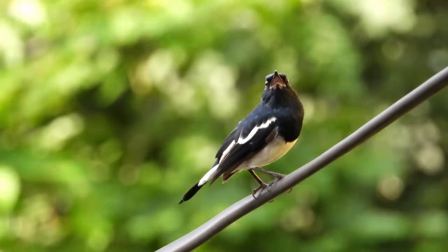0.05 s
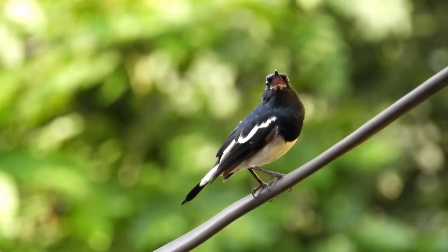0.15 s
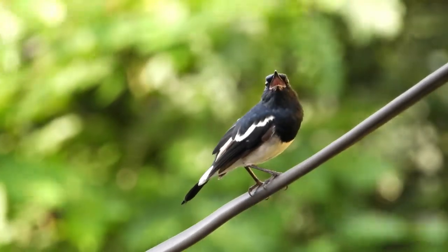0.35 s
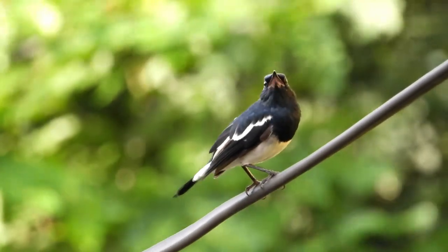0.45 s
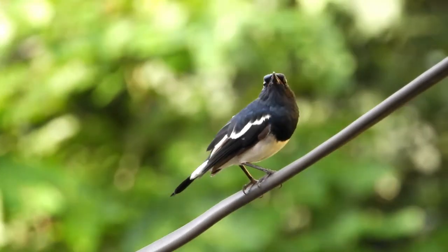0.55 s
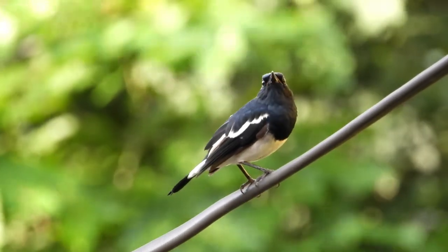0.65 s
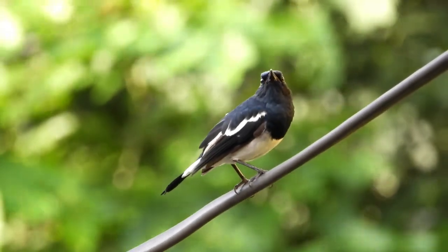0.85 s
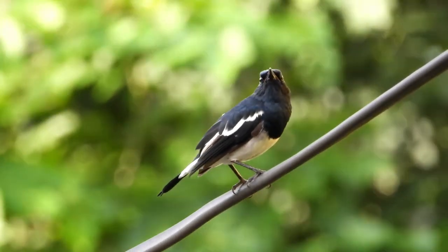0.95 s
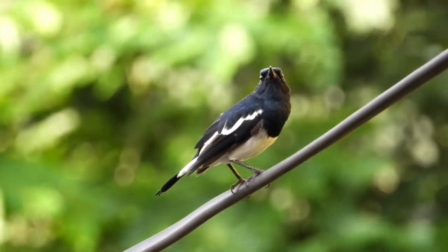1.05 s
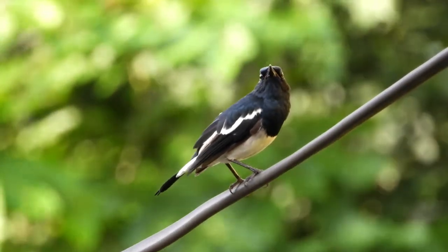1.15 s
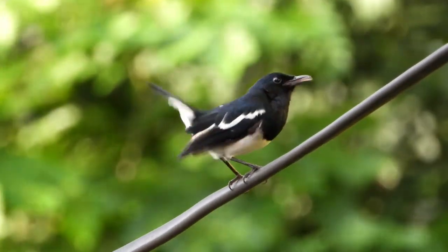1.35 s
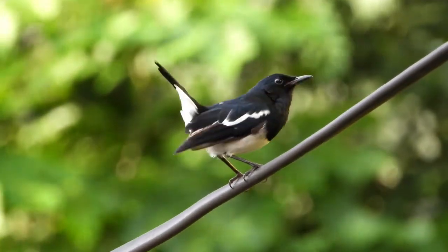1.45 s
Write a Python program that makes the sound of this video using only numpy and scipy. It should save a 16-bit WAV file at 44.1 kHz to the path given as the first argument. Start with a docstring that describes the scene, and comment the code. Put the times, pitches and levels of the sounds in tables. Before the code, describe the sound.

A small bird whistles one loud, high, clear note from about 0.2 to 0.6 seconds, arching, sagging, then flicking upward, its fluttering echo fading by about 1.2 seconds. Faint, close ticks come just before it and near its end. Soft, distant hollow knocks repeat four times a second over a gentle outdoor hiss. From about 1 to 1.5 seconds, a faint tone wavers far away.

```python
"""A soft outdoor wash of noise with tiny low blips is there from the start. A bright tick sounds nearby.
Far off, something hollow is knocked four times a second. With the first knock, a small bird on a wire
whistles one loud, high, nearly pure note that arches, sags and flicks up at its end. Trees and walls
scatter it into a dense, beating echo, and the loudest beats overload the recorder. A second tick comes
late in the note. As the echo fades, a faint, wavering tone is heard far away."""
import sys
import numpy as np
from scipy import signal
from scipy.io import wavfile

SR = 44100
rng = np.random.default_rng(int(sys.argv[2]) if len(sys.argv) > 2 else 0)


def dump(signal):
    """Clip the signal to [-1, 1] and save it as 16-bit WAV at the path in sys.argv[1]."""
    limited = np.clip(np.atleast_2d(signal).T, -1, 1)
    pcm = np.round(limited * 32767).astype(np.int16)
    wavfile.write(sys.argv[1], SR, pcm)


N = 66150   # 1.5 seconds


def from_db(db):
    """Turn decibels into a number to multiply by."""
    return 10 ** (np.asarray(db) / 20)


def rms_one(x):
    """Scale a signal so its average size (rms) is 1."""
    return x / np.sqrt(np.mean(x ** 2) + 1e-20)


def in_time(rows):
    """Join a table's points in time with straight lines: one curve for each later column."""
    times_s, *columns = np.transpose(rows)
    return [np.interp(np.arange(N) / SR, times_s, column) for column in columns]


def at_hz(points, hz):
    """Read a table at any pitch, with octaves evenly spaced."""
    pitches_hz, values = np.transpose(points)
    return np.interp(np.log(hz), np.log(pitches_hz), values)


def drift(rate_hz):
    """A smooth random wander of about plus or minus 1; a higher rate wanders faster."""
    step, settle = 40, 2000   # samples per step, opening steps thrown away
    r = np.exp(-2 * np.pi * step * rate_hz / SR)
    noise = rng.standard_normal(N // step + settle + 2)
    slow = signal.lfilter([1], [1, -2 * r, r * r], noise)[settle:]
    return np.interp(np.arange(N) / step, np.arange(len(slow)), rms_one(slow))


def stereo(pair, alike):
    """Mix two unrelated signals into left and right: alike 0 is wide, 1 is the same in both ears."""
    return np.sqrt((1 + alike) / 2) * pair[0] + np.sqrt((1 - alike) / 2) * pair[1] * [[1], [-1]]


def ring(force, hz, fade_s, soften=False):
    """Ring at one pitch when pushed. Here and below, fade_s is the time to fall by 60 dB."""
    r, w = from_db(-60 / (fade_s * SR)), 2 * np.pi * hz / SR
    gain = 1 - r if soften else 1   # keeps a ringing input from piling up
    return signal.lfilter([0, gain * np.sin(w)], [1, -2 * r * np.cos(w), r * r], force)


def struck(blows, modes, level_db, rattle_s, band_hz):
    """Each blow is a brief rattle of contacts that sets the object's own pitches (modes) ringing."""
    t = np.arange(int(.03 * SR)) / SR
    out = 0
    for hz, mode_db, fade_s in modes:
        octaves_up = np.log2(hz / np.sqrt(np.prod(band_hz)))   # from the middle of the band
        force = np.full(N, 1e-18)
        for start_s, strength_db, brightness in blows:
            rattle = rng.standard_normal(len(t)) * np.exp(-t / rattle_s) / np.sqrt(rattle_s * SR)
            gain = from_db(strength_db + level_db + mode_db + brightness * octaves_up)
            start = int(start_s * SR)
            force[start:start + len(t)] += gain * rattle
        out = out + ring(force, hz, fade_s)
    return signal.sosfilt(signal.butter(4, band_hz, "band", fs=SR, output="sos"), out)


def scatter(x, echo_db, fade_s, alike=0.26, left_db=0):
    """The direct sound plus countless small echoes from all round, made with a fading burst of noise."""
    t = np.arange(N) / SR
    rise_s, early_fade_s, farthest_s = 0.0035, 0.1, .31
    early = from_db(5.5 - 60 * t / early_fade_s)   # near leaves and walls echo strongly
    late = from_db(-60 * t / fade_s - 6 * (t > farthest_s))   # weaker past the farthest reflectors
    shape = (1 - np.exp(-t / rise_s)) * (late + early)
    tail = stereo(rng.standard_normal((2, N)), alike) * shape / np.sqrt(np.sum(shape ** 2))
    direct = x * from_db([[left_db / 2], [-left_db / 2]])
    return direct + from_db(echo_db) * signal.fftconvolve(np.atleast_2d(x), tail, axes=1)[:, :N]


def wash():
    """Soft outdoor noise, built from bands a third of an octave wide that each flicker a little."""
    # how strong the low and high parts are: pitch_hz, relative_db
    tone_colour = [(25, -31), (50, -34), (80, -16), (125, -15), (190, 0), (260, -11), (400, -7.5),
                   (600, -7.5), (800, -4), (1050, -4), (1300, -4.5), (1700, -7.5), (2500, -9), (3100, -11),
                   (4600, -6), (6400, -12), (8200, -17), (10500, -22.5), (12500, -20)]
    # how alike the two ears are: pitch_hz, likeness (0 to 1)
    likeness = [(30, .25), (70, .3), (140, 0.96), (300, 0.75), (600, 0.79), (1200, 0.8), (2500, 0.58),
                (5000, 0.22), (9000, 0.038)]
    # loudness of the whole wash: time_s, level_db
    loudness = [(0.0, -32.5), (0.354, -34), (0.7, -36), (1.5, -36)]
    out, edges_hz = 0, 22 * 2 ** np.arange(0, 9.5, 1 / 3)
    white = rng.standard_normal((2, 2, N))
    for k, (low, high) in enumerate(zip(edges_hz, edges_hz[1:])):
        hz = np.sqrt(low * high)
        pair = signal.sosfilt(signal.butter(2, [low, high], "band", fs=SR, output="sos"), white[k % 2])
        flicker_db = 2.36 * drift(rate_hz=7.1)
        out = out + from_db(at_hz(tone_colour, hz) + flicker_db) * stereo(pair, at_hz(likeness, hz))
    out = signal.sosfilt(signal.cheby2(10, 40, 12100, fs=SR, output="sos"), out)   # cut the top hiss
    return from_db(in_time(loudness)[0]) * rms_one(out)


def blips():
    """Tiny random pushes each ring one of 24 low pitches, making soft, short blips in the wash."""
    per_s, level_db, fade_s = 120, -43, .06
    pushes = (rng.random(N) < per_s / SR) * from_db(3.7 * rng.standard_normal(N))
    chosen_pitch, out = rng.integers(0, 24, N), 0
    for k, hz in enumerate(np.geomspace(230, 1250, num=24)):
        ping = ring(pushes * (chosen_pitch == k) + 1e-18, hz, fade_s)
        out = out + ring(ping, hz, fade_s, soften=True)   # ringing twice makes each blip swell in
    return from_db(level_db) * rms_one(out)


def ticks():
    """Two sharp taps nearby ring high and die fast; the first is a quick double contact."""
    # the contacts: start_s, strength_db, brightness_db_per_octave
    taps = [(.0625, -24, 2.5), (.0672, -37, -3), (.553, -30.5, 5)]
    # how a tick rings: pitch_hz, relative_db, fade_s
    modes = [(3200, -5.5, 0.01), (4900, 3, 0.0034), (5760, -6, 0.0075), (6790, -2, 0.021),
             (7590, -1, 0.0071), (8700, -12, 0.0039), (9600, -10, 0.0063), (12000, -7, 0.0024),
             (13000, -27, .005)]
    clicks = struck(taps, modes, level_db=10, rattle_s=.0035, band_hz=(2800, 14000))
    return scatter(clicks, echo_db=-0.5, fade_s=0.059)


def knocks():
    """Something hollow rings far off at each blow, and a brighter second contact follows at once."""
    # the blows: start_s, strength_db, brightness_db_per_octave
    blows = [(0.1857, -21, -1), (0.4478, -25.5, -0.5), (0.7028, -25, .5), (.955, -29, -1),
             (1.1927, -26, -2.5)]
    # how the hollow thing rings: pitch_hz, relative_db, fade_s
    body_modes = [(341.5, -19, 0.16), (604, -11, 0.097), (1028, -4, 0.038), (1420, -2, 0.021),
                  (1610, -9, 0.032), (1886, -4.5, 0.067), (2306, -4.5, 0.019), (2630, -3, 0.023),
                  (3020, -5.5, 0.023), (3330, -6, 0.029), (3660, -8.5, 0.03)]
    # how the second contact rings: pitch_hz, relative_db, fade_s
    rebound_modes = [(4180, 8, 0.0046), (4500, 5.5, 0.018), (5250, -3, 0.0059), (5530, -4, 0.0067),
                     (6800, -4, 0.0033), (7700, 0, .004)]
    rattle_s, rebound_s = 0.0058, 0.013
    rebounds = [(start_s + rebound_s, strength_db, 0) for start_s, strength_db, _ in blows]
    body = struck(blows, body_modes, level_db=4.5, rattle_s=rattle_s, band_hz=(306, 3800))
    bounce = struck(rebounds, rebound_modes, level_db=-3.5, rattle_s=rattle_s, band_hz=(3600, 8500))
    return scatter(body + bounce, echo_db=1, fade_s=0.13, alike=0.74)


def bird_whistle():
    """A gliding pure tone and its faint octave, a little to the left, echoing off trees and walls."""
    # the bird's note: time_s, pitch_hz, level_db, octave_db (compared with the note)
    note = [(.186, 4710, -40, -23), (.2, 4930, -25, -32), (.22, 5112, -15, -30), (.25, 5250, -14.5, -38),
            (.28, 5345, -9, -38.5), (.305, 5359, -12, -39), (.317, 5600, -15.5, -38),
            (.328, 5340, -19, -35), (.355, 5470, -9.5, -36.5), (.385, 5347, -17.5, -34),
            (.418, 5320, -4, -41.5), (.44, 5143, -13.5, -41), (.455, 5083, -10, -31), (.475, 5048, -9, -35),
            (.51, 4968, -14, -28), (.54, 4927, -11, -31.5), (.572, 4965, -9, -34), (.588, 5183, -17.5, -28),
            (.607, 5545, -14.5, -43), (.625, 6060, -15.5, -60), (.634, 6400, -41, -48)]
    # how unsteady the pitch is: time_s, wobble_hz
    wobble = [(.2, 10), (.3, 18), (.34, 55), (.44, 55), (.5, 25), (.58, 15), (.63, 30)]
    pitch_hz, level_db, octave_db = in_time(note)
    wobble_hz = in_time(wobble)[0] * drift(rate_hz=120)
    phase = 2 * np.pi * np.cumsum(pitch_hz + wobble_hz) / SR
    t = np.arange(N) / SR
    singing = (t > note[0][0]) * (t < note[-1][0])
    level = np.sqrt(2) * from_db(level_db) * singing
    tone = level * np.sin(phase)
    octave = level * from_db(octave_db) * np.sin(2 * phase)
    return (scatter(tone, echo_db=2, fade_s=0.63, left_db=5.5)
            + scatter(octave, echo_db=3.5, fade_s=0.6, left_db=5.5))


def far_tone():
    """A faint, wavering tone far off: a narrow band of noise that follows a pitch curve."""
    # the tone's path: time_s, pitch_hz, level_db
    path = [(.85, 959, -62), (.93, 975, -59), (.97, 995, -38.5), (1.05, 985, -49), (1.12, 1100, -49),
            (1.17, 1080, -45.5), (1.24, 1067, -40), (1.3, 1050, -50), (1.34, 1025, -33.5),
            (1.375, 961, -48.5), (1.41, 935, -52), (1.46, 925, -45), (1.5, 1020, -43)]
    pitch_hz, level_db = in_time(path)
    phase = 2 * np.pi * np.cumsum(pitch_hz) / SR
    waver_hz = 16.5
    return from_db(level_db) * (drift(waver_hz) * np.sin(phase) + drift(waver_hz) * np.cos(phase))


def scene():
    """Add up all the sounds, in the order they are first heard."""
    return wash() + blips() + ticks() + knocks() + bird_whistle() + far_tone()


def record(dry):
    """The recorder squashes peaks that near or pass full scale (1), then cuts the highest treble."""
    sharpness, cutoff_hz = 12.0, 16200
    squashed = dry / (1 + np.abs(dry) ** sharpness) ** (1 / sharpness)
    return signal.sosfilt(signal.cheby2(12, 70, cutoff_hz, fs=SR, output="sos"), squashed)


dry = scene()
out = record(dry)
dump(out)
```